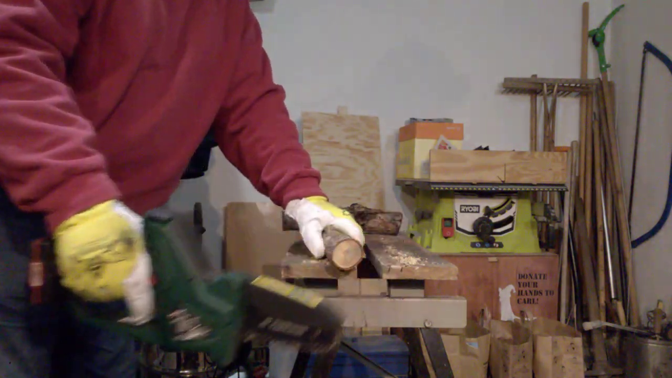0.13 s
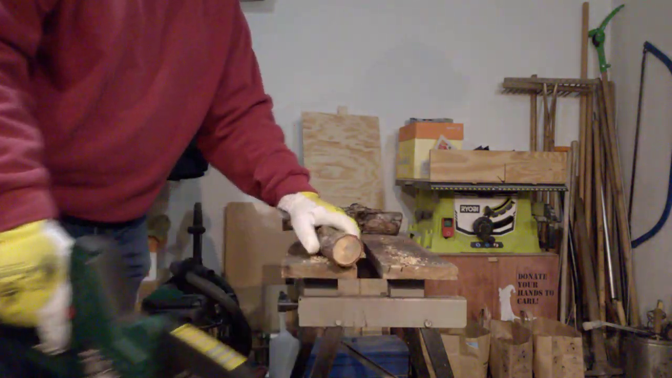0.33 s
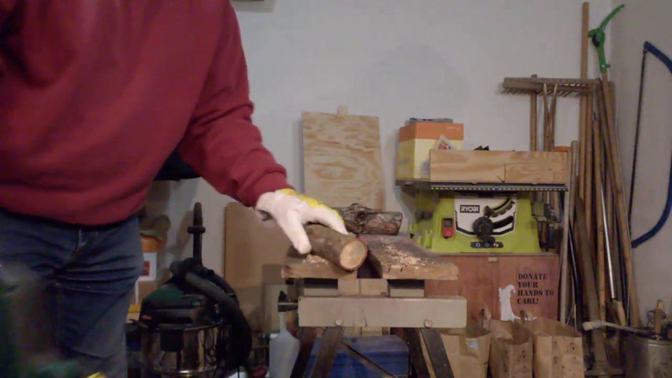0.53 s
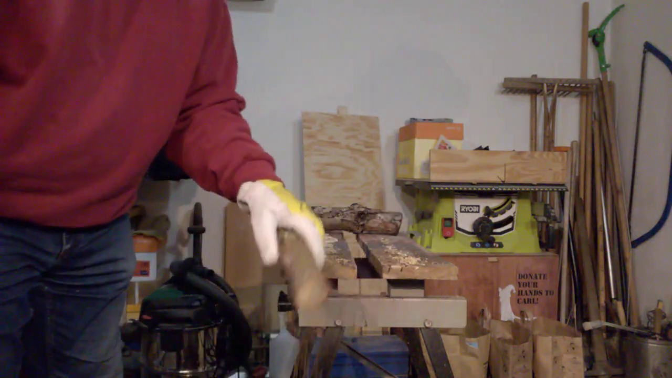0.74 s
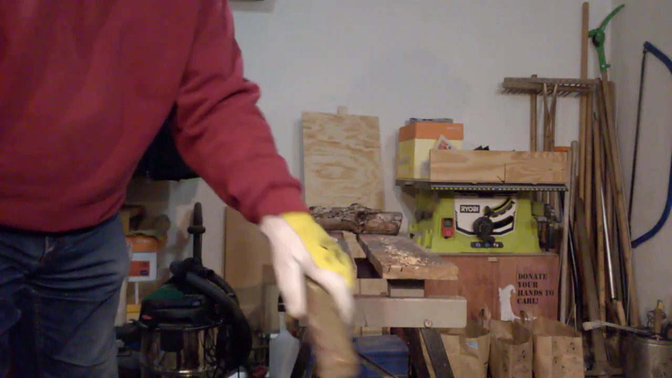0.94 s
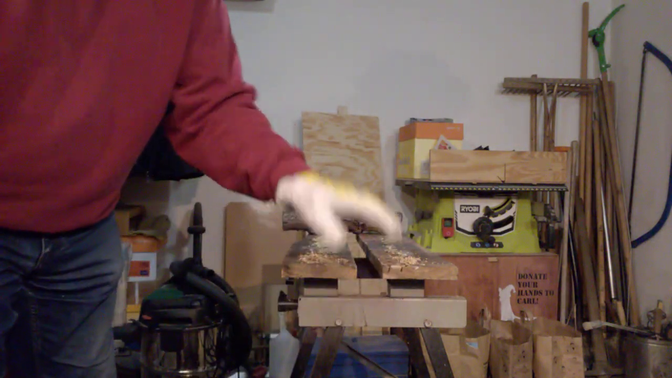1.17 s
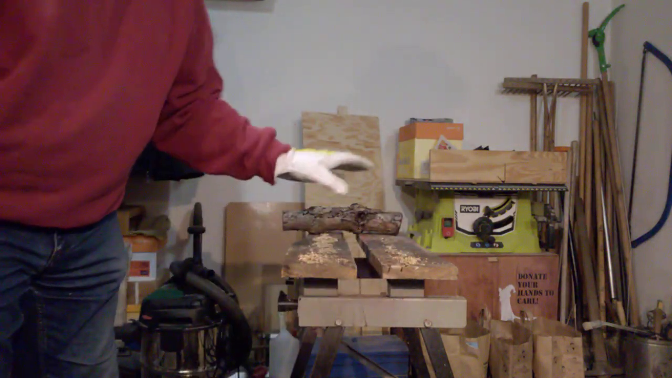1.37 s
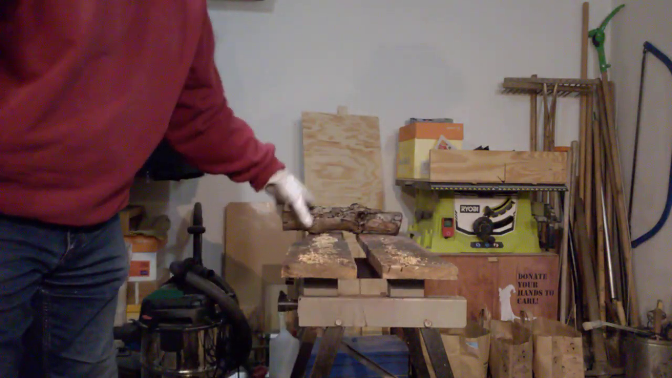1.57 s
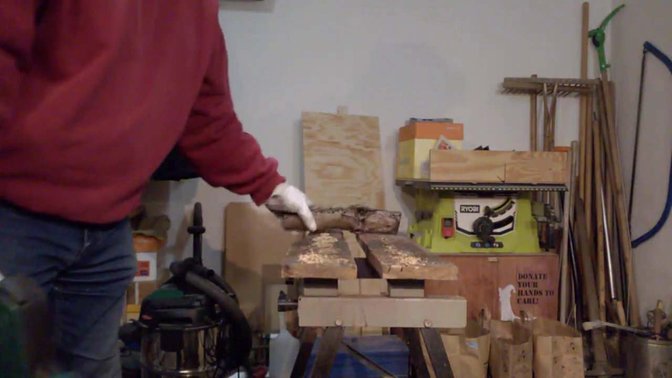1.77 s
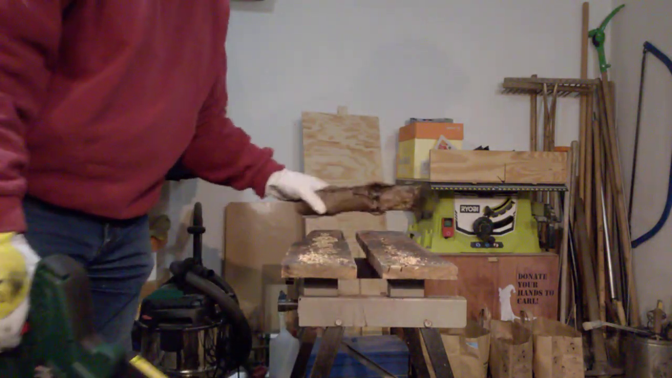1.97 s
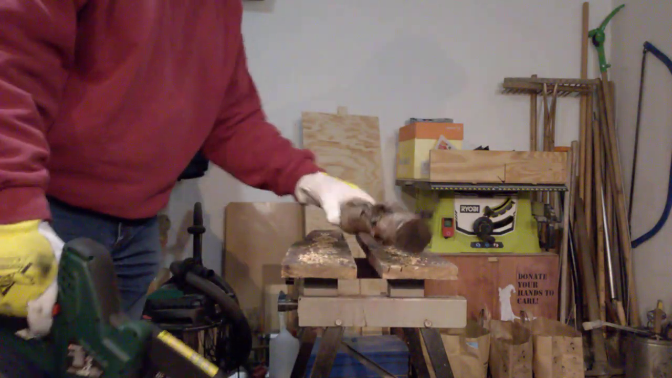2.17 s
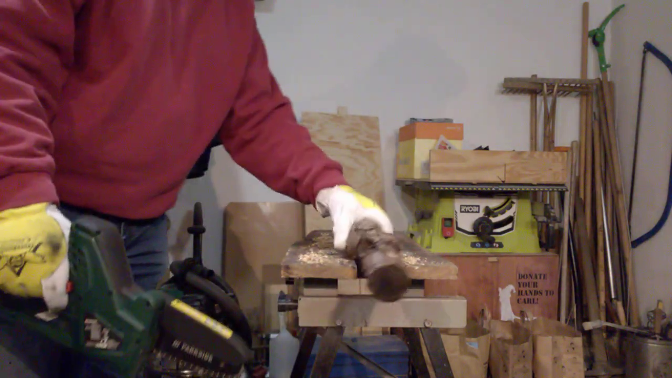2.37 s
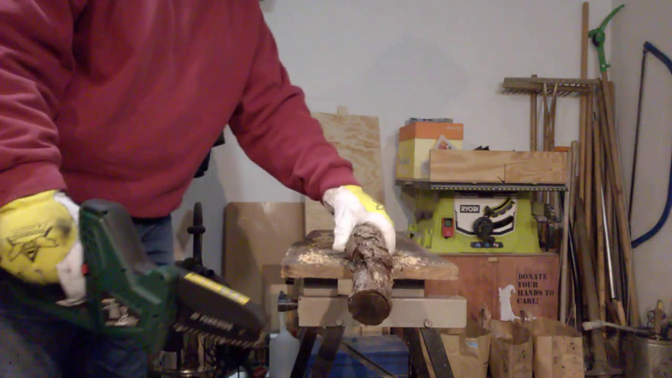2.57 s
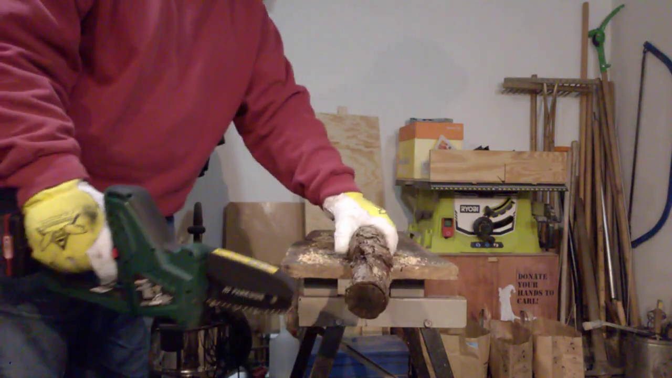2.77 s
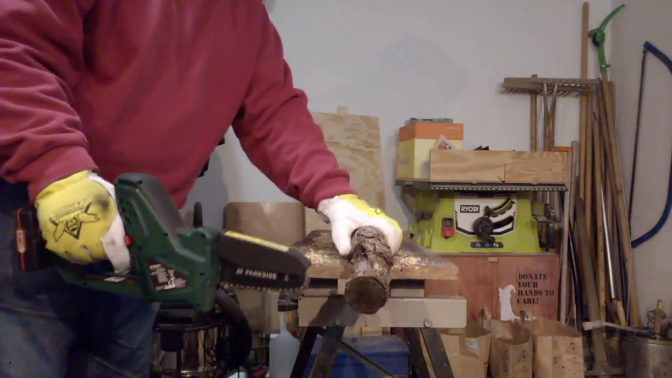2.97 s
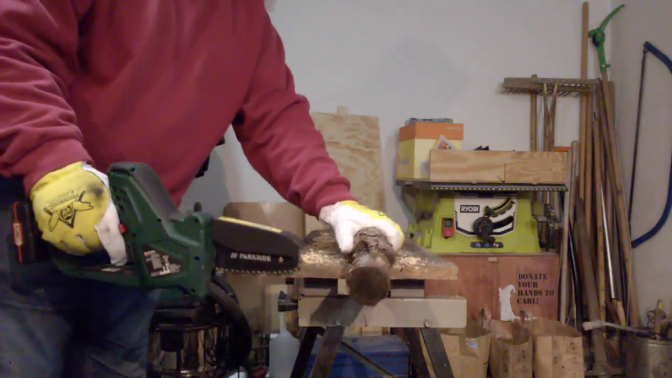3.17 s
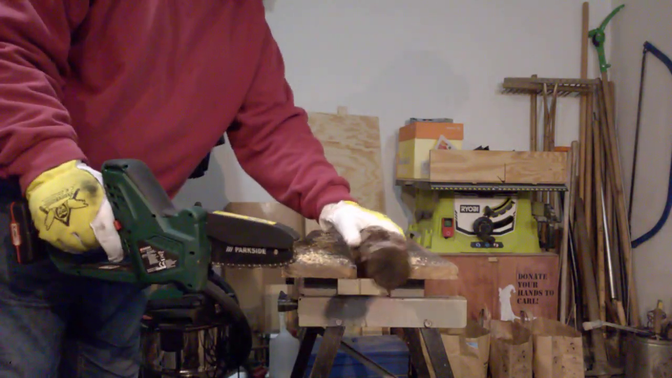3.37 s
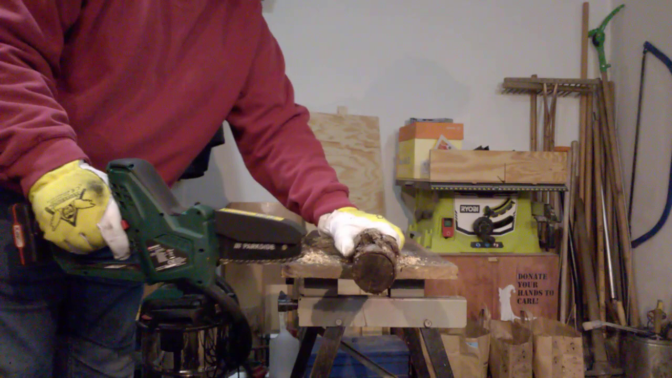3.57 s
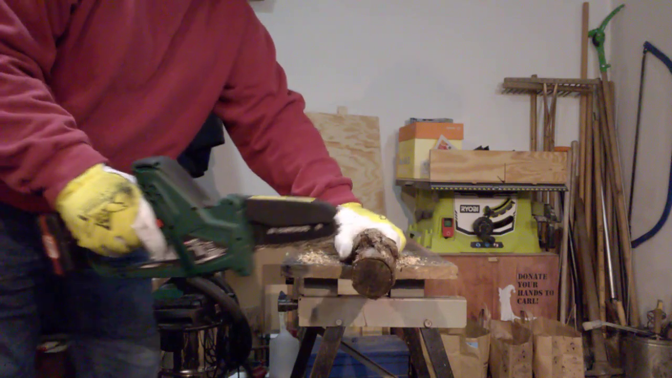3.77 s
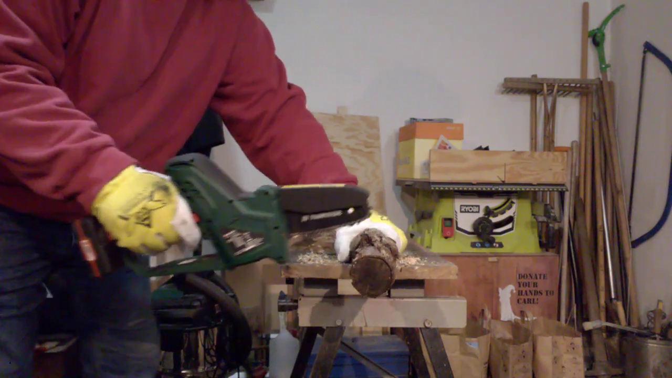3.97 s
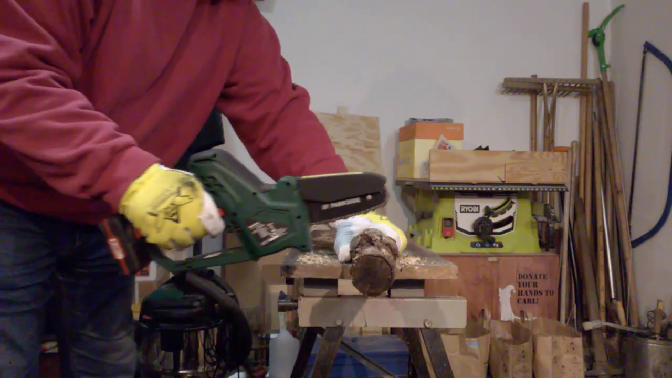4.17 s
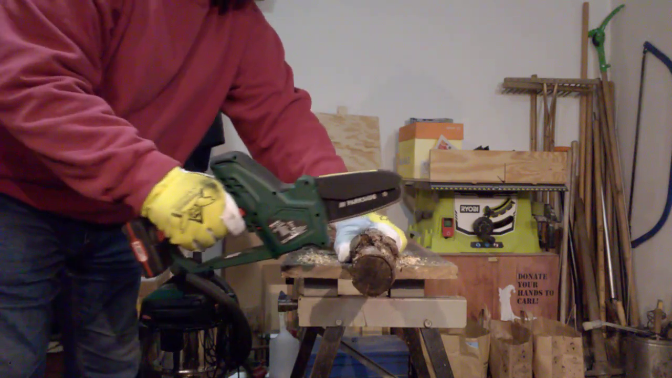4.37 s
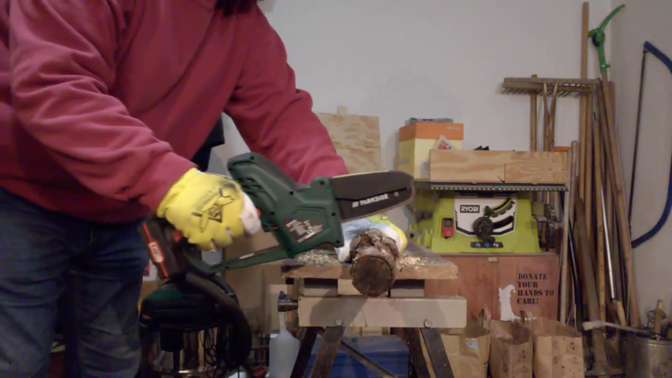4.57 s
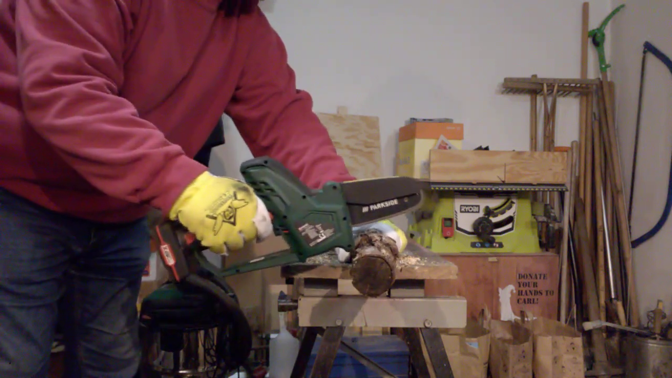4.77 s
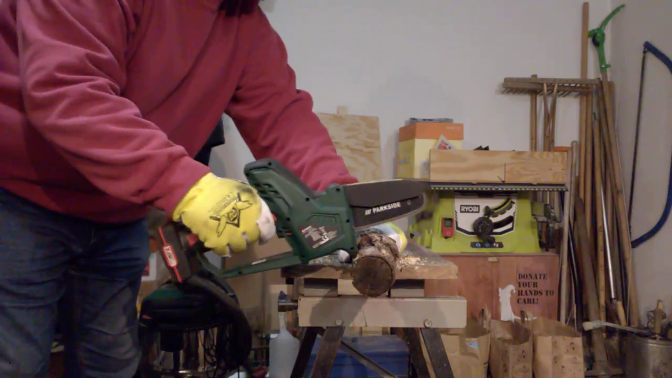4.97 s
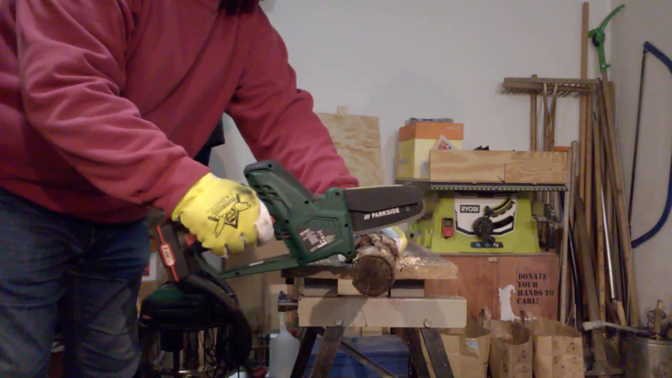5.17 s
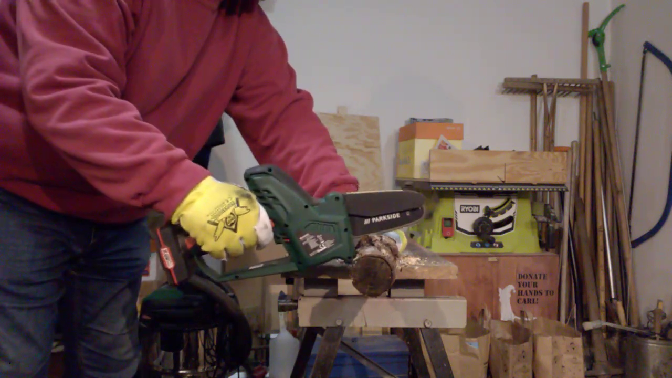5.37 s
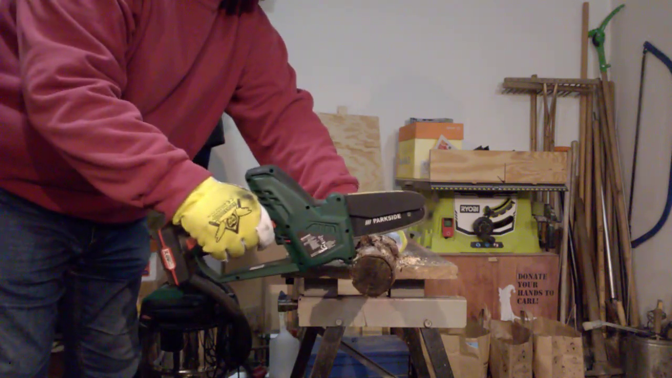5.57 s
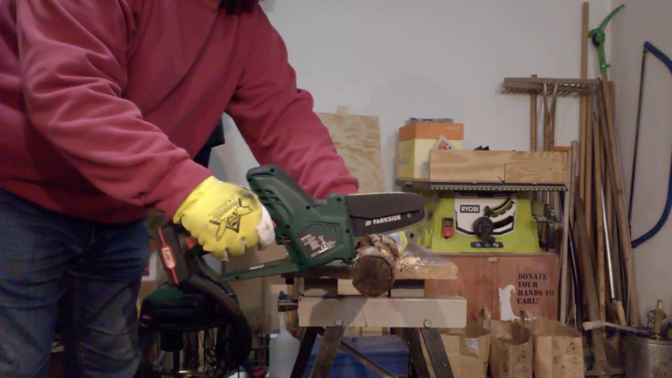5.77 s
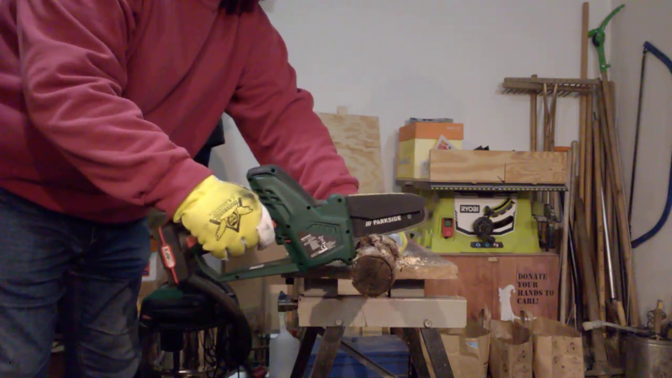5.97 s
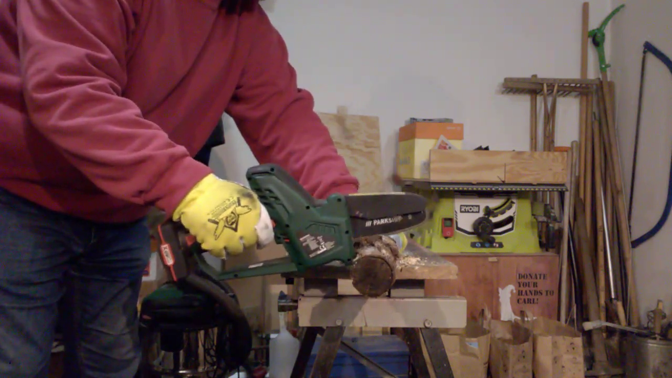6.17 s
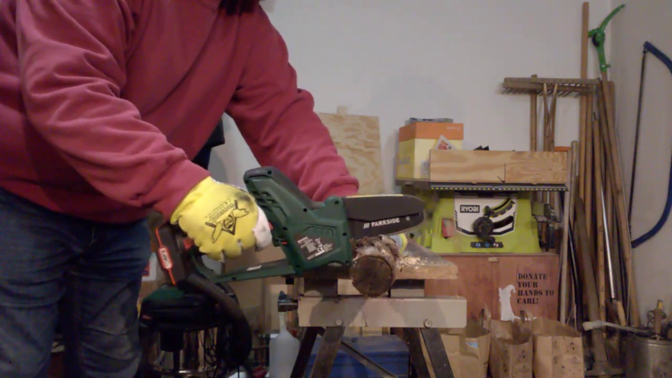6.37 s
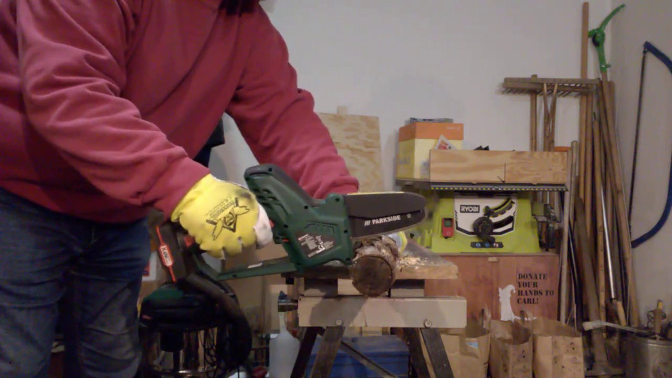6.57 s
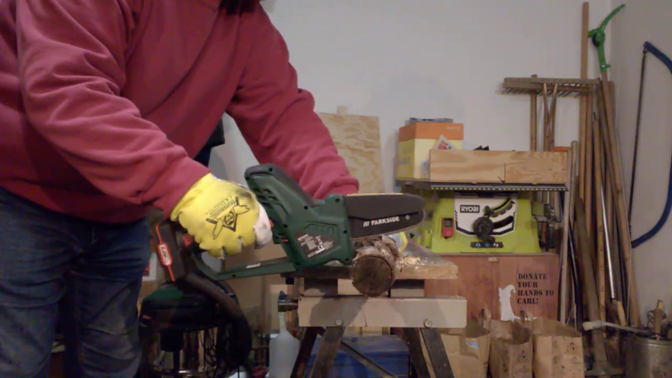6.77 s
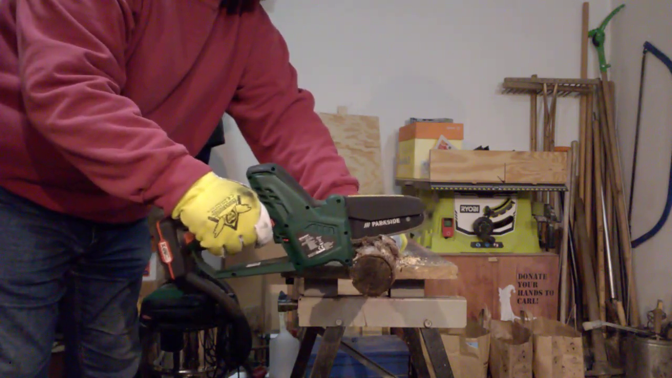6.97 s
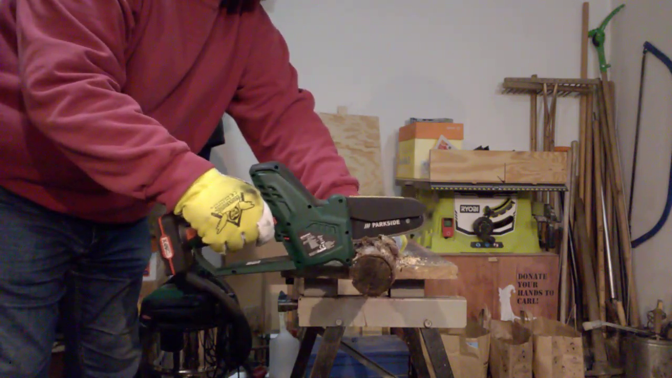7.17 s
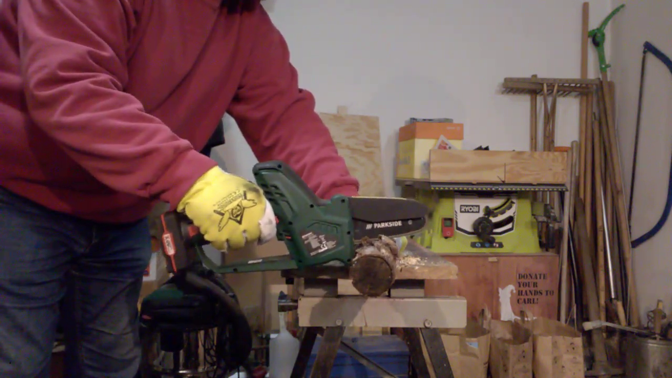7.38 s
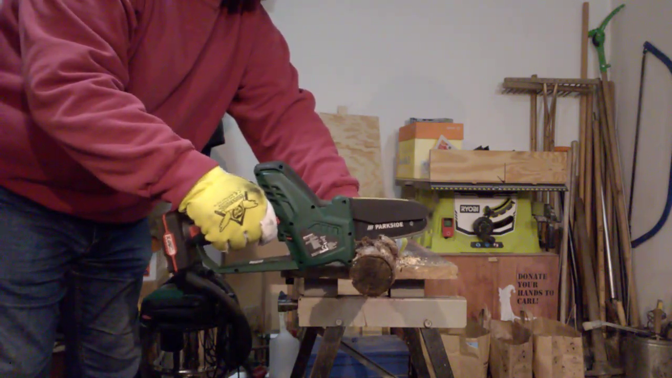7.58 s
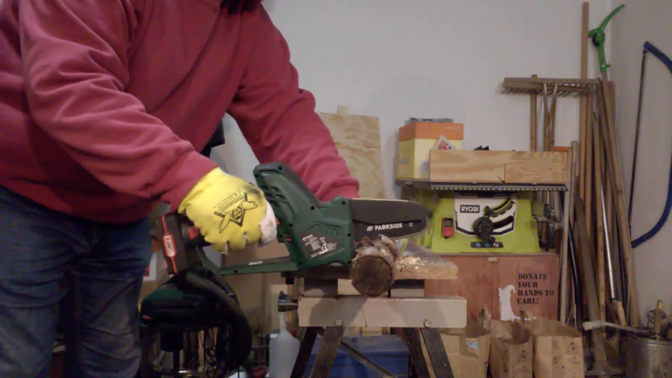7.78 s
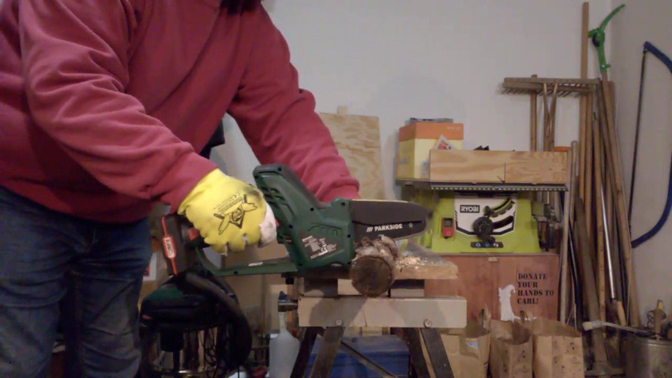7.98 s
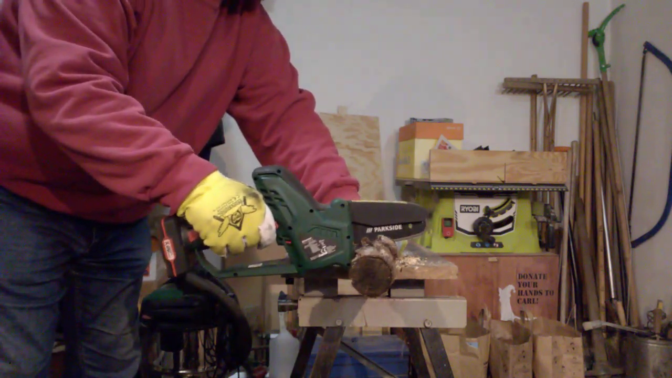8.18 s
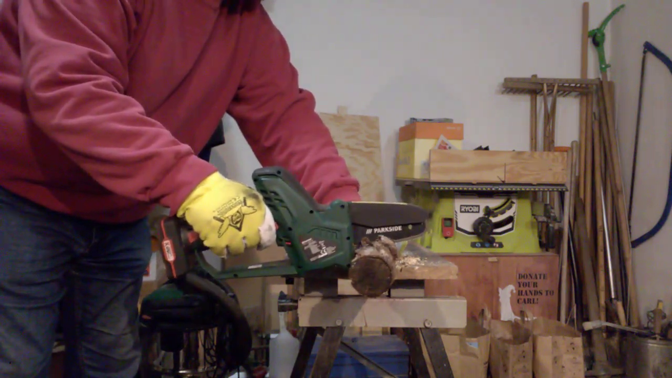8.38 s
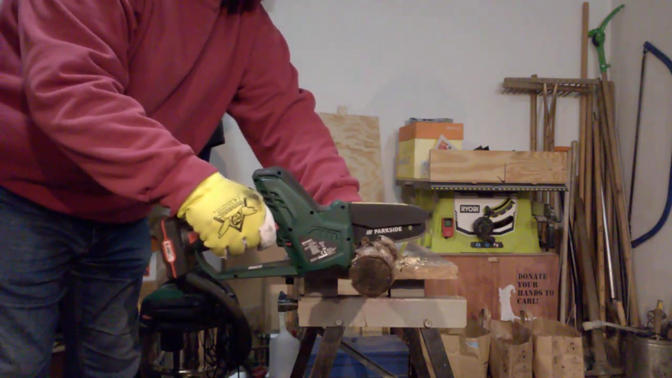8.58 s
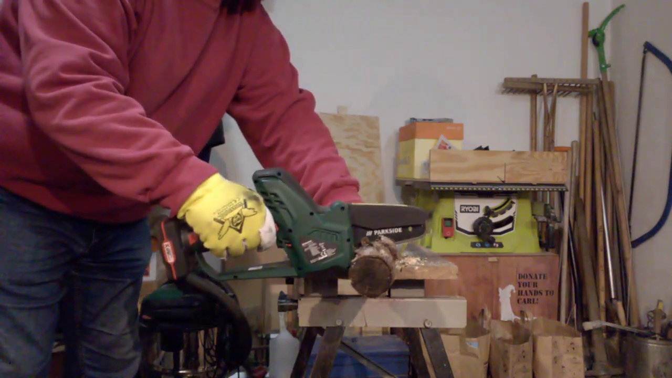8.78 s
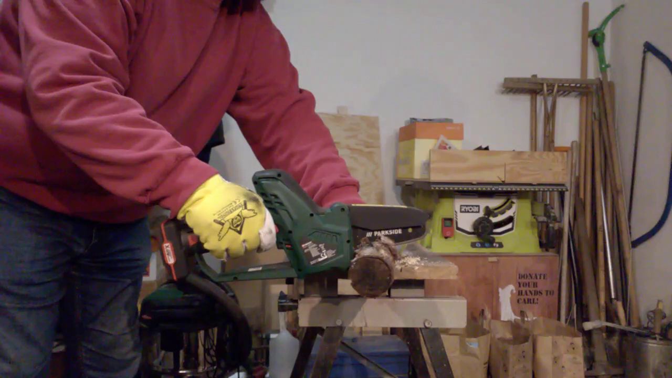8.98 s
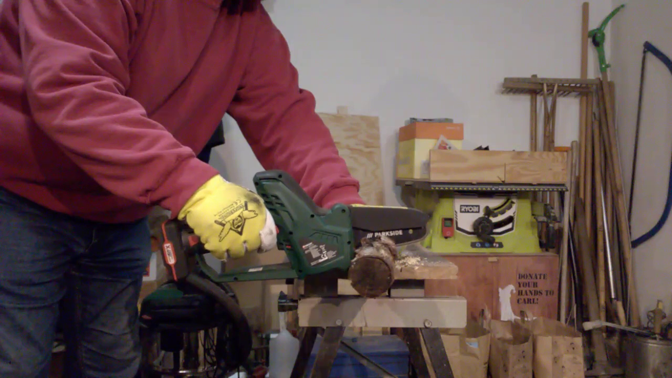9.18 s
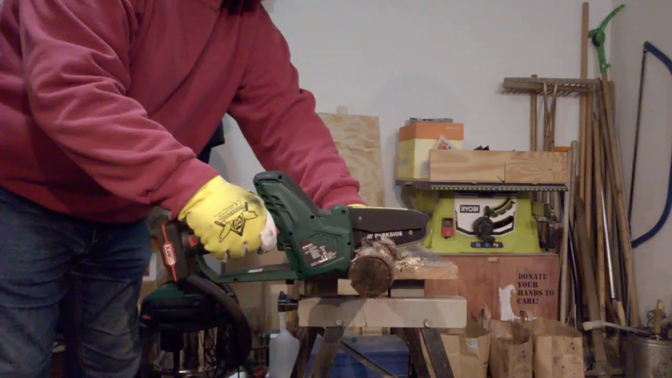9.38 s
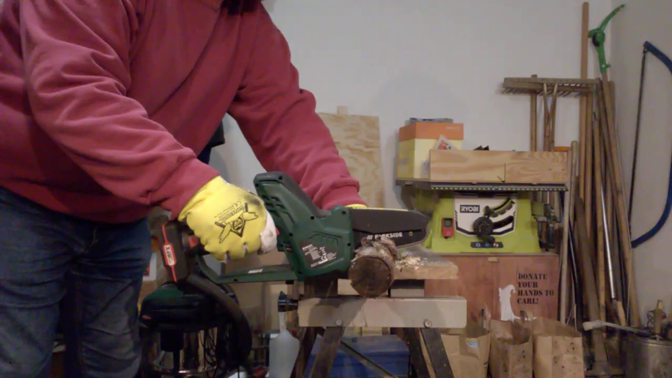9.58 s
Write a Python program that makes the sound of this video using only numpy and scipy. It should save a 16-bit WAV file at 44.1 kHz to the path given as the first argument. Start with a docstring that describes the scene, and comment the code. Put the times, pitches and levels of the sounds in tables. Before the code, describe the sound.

Loud crunchy wood knocks come first, some with a hollow ring, mixed with faint taps and grainy glove rubs. After quieter adjustments, a small electric chainsaw spins up quickly, a high squeal giving way to a bright metallic chain hiss. Entering the branch, it becomes rougher and lower, the motor whining under load until the end. Heard centrally at a moderate distance in a hard-walled, echoing workshop with very quiet background hum.

```python
"""Knocks come first, in a reverberant workshop: a sawn branch is put aside and the next set on a sawhorse. Each
knock is a crunch of noise with ringing wood and a hanging piece of steel, some with an added hollow note; taps
and rubs lie between. A small battery chainsaw then starts with a squeal of its windings, and its free chain
hisses: noise and uneven clicks at the pace of the links. It bites into the branch: the chain slows, the wood
rumbles with each cutter, and the motor's tones whine under the load. A faint hum and soft noise lie beneath."""
import sys
import numpy as np
from scipy import signal
from scipy.fft import rfft, irfft, next_fast_len
from scipy.io import wavfile
from scipy.ndimage import uniform_filter1d, map_coordinates

SR = 44100
rng = np.random.default_rng(int(sys.argv[2]) if len(sys.argv) > 2 else 0)


def store_wav(level_fs):
    """Save 16-bit WAV to argv[1]."""
    pcm = np.round(np.clip(np.atleast_2d(level_fs), -1, 1) * 32767)
    wavfile.write(sys.argv[1], SR, pcm.T.astype(np.int16))


N = 424241

# tone colour of the chain inside the cut: pitch_hz [Hz], relative level_db [dB]
CUTTING = [(120, -30), (240, -11.5), (400, -14), (600, -6), (950, -3.5), (1500, -3.5), (2200, -4),
           (3200, -1), (5700, -4.5), (8000, 0), (9900, 0), (12000, -14), (15700, -13.5)]
# tone colour of sliding and tapping: pitch_hz [Hz], relative level_db [dB]
RUSTLE = [(90, -41), (200, -6), (900, -4), (1600, -1.5), (3000, -3.5), (7500, -7.5), (10400, -5.5),
          (11800, -18.5), (15700, -18)]
# squeal of the windings as the rotor lines up:
# pitch_hz [Hz], level_db before mixing [dB], t60_s, the time to fade by 60 dB [s]
SQUEAL = [(984, -54, 1.2), (3963, -39.5, 1.1)]


def amp(db):
    """Turn decibels into a gain."""
    return 10 ** (np.asarray(db) / 20)


def unit(x):
    """Scale to an rms (average strength) of 1."""
    return x / np.sqrt(np.mean(x ** 2) + 1e-20)


def along(points, hz):
    """Read between (Hz, value) points on a logarithmic pitch axis."""
    point_hz, values = np.transpose(points)
    return np.interp(np.log(hz + 1), np.log(point_hz + 1), values)


def wobble(rate):
    """Make a smooth random curve with this many random points a second."""
    points = rng.standard_normal(int(N * rate / SR) + 4)
    return map_coordinates(points, [np.arange(N) * rate / SR])


def filtered(x, response):
    """Multiply the spectrum of x by a response that depends on frequency."""
    size = next_fast_len(len(x) + SR // 4)
    spectrum = rfft(x, size) * response(np.fft.rfftfreq(size, 1 / SR))
    return irfft(spectrum, size)[:len(x)]


def coloured(x, spectrum):
    """Shape x by a table of (Hz, dB), then scale to rms 1."""
    return unit(filtered(x, lambda hz: amp(along(spectrum, hz))))


def resonances(modes, f):
    """Add up the complex responses of parts that ring: pitch_hz, width_hz, level_db."""
    return sum(amp(db) * 1j * f * width / (centre * centre - f * f + 1j * f * width)
               for centre, width, db in modes)


def room(x, direct_db):
    """Add a fresh random echo tail, each pitch fading at its own pace, to the direct sound."""
    # how long echoes last: pitch_hz [Hz], t60_s, the time to fade by 60 dB [s]
    echo_times = [(100, 0.74), (500, 0.49), (3000, 0.4), (8000, 0.41), (15000, 0.29)]
    hz, t, noise = signal.stft(rng.standard_normal(SR), SR, nperseg=256)
    fading = noise * amp(-60 * t / along(echo_times, hz)[:, None])
    tail = signal.istft(fading, SR, nperseg=256)[1]
    tail = tail / np.linalg.norm(tail)
    tail[0] += amp(direct_db)  # direct sound, relative to the whole tail
    return signal.fftconvolve(x, tail / np.linalg.norm(tail))[:len(x)]


def shifting_room(x, direct_db, size=14000):
    """Change the echoes as the saw moves: each short overlapping stretch gets its own tail."""
    out = np.zeros(N + SR + 2 * size)
    fade = np.sin(np.pi * np.arange(2 * size) / (2 * size))
    padded = np.pad(x, (0, 2 * size))
    for start in range(4 * SR - size, N, size):
        stretch = padded[start:start + 2 * size] * fade
        piece = room(np.pad(stretch, (0, SR // 2)), direct_db)
        out[start:start + len(piece)] += piece
    return out[:N]


def tone(turns, blur, rate):
    """Make a sine at rms 1 whose strength and phase waver; rate is in random points a second."""
    carrier = np.exp(2j * np.pi * (turns + rng.random()))
    waver = 1 + blur * (wobble(rate) + 1j * wobble(rate))
    return unit(np.real(carrier * waver / np.sqrt(1 + 2 * blur ** 2)))


def clicks(turns, scatter, size_db):
    """Make one impact per whole turn, uneven in time, strength and direction."""
    whole = np.arange(1, int(turns[-1]))
    chance = rng.standard_normal((len(whole), 3))
    at = np.interp(whole + scatter * chance[:, 0], turns, np.arange(N)).astype(int)
    strength = amp(size_db * chance[:, 1]) * np.sign(chance[:, 2])
    return unit(np.bincount(at, strength, N))


def background():
    """Still air is soft coloured noise; a faint hum is a few slightly wavering low tones."""
    # steady hum in the room: pitch_hz [Hz], level_db [dB]
    hum_tones = [(44, -79), (86, -85), (168, -88.5), (393, -94.5)]
    # tone colour of the still air: pitch_hz [Hz], relative level_db [dB]
    air_colour = [(15, -31.5), (25, -5), (64, -10), (91, -10), (391, -16), (831, -24), (2870, -28.5),
                  (6990, -25), (9930, -27), (12300, -37), (15700, -37.5)]
    t = np.arange(N) / SR
    hum = sum(amp(db) * tone(hz * t, blur=0.36, rate=6) for hz, db in hum_tones)
    return hum + amp(-79.5) * coloured(rng.standard_normal(N), air_colour)


def handling():
    """Gloves, sleeves and bark slide in short grainy strokes, each with its own stressed band."""
    # strokes: middle_s [s], half_length_s [s], level_db before the swell and room [dB],
    # pitch_hz of the stressed band [Hz]
    rub_rows = [(0.148, 0.028, -57, 8450), (0.272, 0.031, -60, 7000), (0.538, 0.015, -49, 9600),
                (0.648, 0.025, -59, 8005), (0.84, 0.013, -76, 9000), (1.108, 0.022, -66, 4500),
                (1.709, 0.042, -65.5, 7000), (1.88, .025, -64, 6100), (2.803, 0.034, -61.5, 6030),
                (3.111, 0.081, -63.5, 5500), (3.441, 0.051, -57, 4800), (3.68, 0.13, -64.5, 6170),
                (3.914, 0.046, -58, 5100), (4.112, 0.027, -64.5, 4950)]
    out, t = np.zeros(N + SR), np.arange(SR) / SR
    for middle_s, half_s, db, centre_hz in rub_rows:
        start = int(max(middle_s - .4, 0) * SR)
        flicker_db = 2 * unit(uniform_filter1d(rng.standard_normal(SR), size=200))
        grain = coloured(rng.standard_normal(SR) * amp(flicker_db), RUSTLE)
        band = [(centre_hz, .5 * centre_hz, 0)]
        boost = 1 + 900 / centre_hz  # lower bands stand out more
        stroke = unit(filtered(grain, lambda f: 0.97 + np.abs(resonances(band, f)) ** 2 * boost))
        swell = np.exp(-.5 * ((t + start / SR - middle_s) / half_s) ** 2)
        out[start:start + SR] += amp(db) * stroke * swell
    return room(out[:N], direct_db=4.5)


def taps():
    """Light contacts of bark, fingers and trigger crunch briefly, each stressing one broad band."""
    # taps: start_s [s], level_db before the fade and room [dB], pitch_hz of the stressed band [Hz]
    tap_rows = [(1.057, -54, 9000), (1.078, -48, 2400), (1.092, -46, 10800), (1.612, -54, 7500),
                (1.682, -46.5, 1650), (2.994, -39, 5000), (3.007, -37.5, 2100), (3.009, -40.5, 6500),
                (3.239, -39, 2300), (3.256, -36.5, 1390), (4.179, -42.5, 6900)]
    out, t = np.zeros(N + SR), np.arange(SR) / SR
    for start_s, db, centre_hz in tap_rows:
        noise = coloured(rng.standard_normal(SR), RUSTLE)
        band = [(centre_hz, 0.85 * centre_hz, 0)]
        grit = unit(filtered(noise, lambda f: 0.1 + np.abs(resonances(band, f))))
        crunch = grit * amp(-60 * t / 0.077) * (1 - np.exp(-t / 0.011))
        out[round(start_s * SR):][:SR] += amp(db) * room(crunch, direct_db=-2.5)
    return out[:N]


def hollow_notes():
    """Some knocks and their touches also ring one hollow note, a fading sine with a soft attack."""
    # notes: start_s [s], pitch_hz [Hz], level_db before the soft attack [dB], t60_s [s]
    note_rows = [(.122, 169, -52.5, 1), (0.5, 72, -56, 0.6), (1.39, 72, -53.5, 0.62), (2.462, 161, -54, .5),
                 (3.257, 250, -59, 0.24), (3.53, 215, -58, .4), (3.603, 215.5, -52.5, 0.31),
                 (3.885, 1217, -52, 0.13)]
    out, t = np.zeros(N), np.arange(SR) / SR
    for start_s, hz, db, t60 in note_rows:
        swell = amp(db - 60 * t / t60) * (1 - np.exp(-t / 0.0056))
        out[round(start_s * SR):][:SR] += swell * np.sin(2 * np.pi * hz * t)
    return out


def blow(brightness):
    """One contact crunches the bark, with room echo, and makes the wood and a hanging piece of steel ring in
    fading sines."""
    # tone colour of the crunch: pitch_hz [Hz], relative level_db before brightness [dB]
    crunch_colour = [(25, -38), (50, -16), (75, -4), (110, -15), (170, -7.5), (270, -4.5), (400, -5.5),
                     (600, -3), (900, -6.5), (1500, -8), (2400, -11), (3270, -7.5), (3800, -16),
                     (7700, -18.5), (10400, -25.5), (11800, -39), (15700, -36)]
    # ringing of branch, sawhorse and a hanging piece of steel (the note near 2 kHz): pitch_hz [Hz], # relative
    # level_db before brightness and chance [dB], t60_s [s]
    ringing_modes = [(168.3, -7.5, 0.44), (282.2, -8.5, 0.7), (395, -20.5, 1.6), (436, -15.5, 1.1),
                     (653, -7, 0.51), (875, -1, 0.23), (1400, -5, 0.26), (2000, -26.5, 1.16),
                     (3305, -7.5, 0.46), (3320, -7, 0.28)]
    attack_s, crunch_t60_s, ring_db = 0.0087, 0.077, -21.5  # ring relative to the blow
    t = np.arange(SR) / SR

    def tilt_db(hz):
        """Brightness in dB per octave, pivoting at 1500 Hz."""
        return brightness * np.log2(hz / 1500)

    colour = [(hz, db + tilt_db(max(hz, 200))) for hz, db in crunch_colour]
    grit = coloured(rng.standard_normal(SR), colour)
    crunch = grit * amp(-60 * t / crunch_t60_s) * (1 - np.exp(-t / attack_s))
    ring = np.zeros(SR)
    for hz, db, t60 in ringing_modes:
        level_db = db + tilt_db(hz) + rng.normal(0, 2.1)
        ring += amp(level_db - 60 * t / t60) * np.sin(2 * np.pi * hz * t)
    return room(crunch, direct_db=-5.5) + amp(ring_db) * ring * (1 - np.exp(-t / 0.0052))


def knocks(count=2):
    """The branch hits sawhorse or floor: one end may touch first, then it lands and rocks to rest."""
    # knocks: start_s [s], level_db before the blow's own shape [dB],
    # brightness [dB per octave], lead_s by which one end touches first [s]
    knock_rows = [(.001, -36.5, 1.3, 0.0055), (.12, -46.5, -1.5, 0.00021), (.290, -27.5, -0.3, .004),
                  (.437, -21, 1.5, 0.016), (1.337, -20.5, 1.4, .010), (2.496, -24.5, 1.9, 0.038),
                  (3.517, -39.5, -3.0, 0.00056), (3.602, -43.5, -2.5, 0.0023), (3.885, -48, -2, 0)]
    touch_db = -14  # relative to the main blow
    # rocking: average time between contacts, first contact relative to the blow, loss at the next
    rock_s, rock_db, rock_loss_db = 0.07, -18.5, 5.5
    out = np.zeros(N + SR)
    for start_s, db, brightness, lead_s in knock_rows:
        contacts = [(start_s, db)]
        if lead_s > 0 and start_s > lead_s:
            contacts.append((start_s - lead_s, db + touch_db))
        for k in range(count):
            rock_at = start_s + rock_s * (k + rng.uniform(.8, 1.2))
            contacts.append((rock_at, db + rock_db - rock_loss_db * k))
        for at, level_db in contacts:
            out[round(max(at, 0) * SR):][:SR] += amp(level_db) * blow(brightness)
    return out[:N]


def motor_start():
    """The drive briefly pulses the windings before the rotor turns; the room holds the fading notes."""
    t = np.arange(N) / SR
    held = np.clip((t - 4.203) / 0.023, 0, 1) * np.clip((4.262 - t) / 0.028, 0, 1)
    since = np.maximum(t - 4.26, 0)
    direct = sum(amp(db) * np.sin(2 * np.pi * hz * t) for hz, db, t60 in SQUEAL)
    walls = sum(amp(db - 60 * since / t60) * tone(hz * t, blur=0.34, rate=36)
                for hz, db, t60 in SQUEAL)
    walls_fade_in = np.clip((t - 4.215) / 0.05, 0, 1)
    return 0.77 * held * direct + 0.5 * walls_fade_in * walls


def rotor_catch():
    """The lowest note of the windings glides upward as the rotor begins to turn."""
    middle_s, half_s, rise_hz_per_s = 4.265, 0.025, 3300
    level_db = -56  # before the swell and room
    t = np.arange(N) / SR
    since = np.clip(t - middle_s + 2 * half_s, 0, None)
    sweep = np.sin(2 * np.pi * (SQUEAL[0][0] * t + .5 * rise_hz_per_s * since ** 2))
    swell = np.exp(-.5 * ((t - middle_s) / half_s) ** 2)
    return room(amp(level_db) * swell * sweep, direct_db=-2)


def snag():
    """The chain grabs the bark for a moment: a short swell of noise with the colour of cutting."""
    t = np.arange(N) / SR
    swell = np.exp(-.5 * ((t - 6.183) / 0.0097) ** 2)
    grab = swell * coloured(rng.standard_normal(N), CUTTING)
    return amp(-23.0) * room(grab, direct_db=2)


def effort():
    """Run-up and the drag of the wood set chain speed, tension, load, depth and rattle gain."""
    # the branch drags the chain down as the saw is pressed in, eased off and pressed harder:
    # time_s [s], pace before the run-up is applied [cutters per second]
    pace_rows = [(5.8, 349), (6.0, 344.5), (6.2, 337), (6.4, 335), (6.6, 346.5), (7.05, 347.5), (7.5, 328),
                 (7.9, 316.5), (8.2, 310), (8.5, 310), (9.05, 299), (9.3, 280.5)]
    # free chain [cutters per second], moment of power, time scale of the run-up
    free_hz, power_on_s, spin_up_s = 349, 4.17, 0.225
    # loss of speed that pulls the chain mostly taut, and loss at full load [cutters per second]
    taut_hz, full_load_hz = 4.1, 69
    # the bar meets the bark, and the time it takes to sink to its full height
    entry_s, sink_s = 5.87, 3.3
    # rattle: running free, added by full load, lost inside the kerf (the sawn slot)
    rattle_db, load_gain_db, kerf_loss_db = -28.5, 2.5, 1.4
    kerf_shade = 0.17  # share of the bar's height that must sink for most of that loss
    t = np.arange(N) / SR
    pace_s, pace_hz = np.transpose(pace_rows)
    pace = np.interp(t, pace_s, pace_hz)
    spin = np.tanh(np.maximum(t - power_on_s, 0) / spin_up_s)
    speed = spin * pace
    tension = 1 - np.exp(-np.maximum(free_hz - speed, 0) / taut_hz)  # high in the run-up too
    load = np.maximum(free_hz - pace, 0) / full_load_hz
    depth = np.clip((t - entry_s) / sink_s, 0, 1)
    level_db = rattle_db + load_gain_db * np.sqrt(load) - kerf_loss_db * np.tanh(depth / kerf_shade)
    return speed, tension, load, depth, amp(level_db) * spin ** 2.5


def chain_slap():
    """Now and then a link hits the guide bar harder: a noise tick and a short ring."""
    t = np.arange(SR // 20) / SR
    out, rattle_gain = np.zeros(N + len(t)), effort()[-1]
    for when, softness, pick in rng.random((110, 3)):
        start = int((4.4 + when * (N / SR - 4.4)) * SR)
        ring = np.sin(2 * np.pi * (3300 + 2300 * pick) * t) * amp(-60 * t / 0.049)
        tick = coloured(rng.standard_normal(len(t)), CUTTING) * amp(-60 * t / 0.017)
        gain = rattle_gain[start] * amp(2.0 - 9.2 * softness)
        out[start:start + len(t)] += gain * (0.76 * ring + tick)
    return room(out[:N], direct_db=5.5)


def chain_rattle(turns, tension, depth, rattle_gain):
    """Links strike the sprocket and scrape along the bar's groove; the kerf changes their colour."""
    # tone colour of the free chain: pitch_hz [Hz], relative level_db [dB]
    free_colour = [(120, -57), (240, -30.5), (340, -23.5), (430, -17.5), (650, -10.5), (950, -6),
                   (1500, -7), (1900, -9), (3100, -5), (6200, -8.5), (8000, -3), (9900, -2.5),
                   (12000, -18.5), (15700, -16.5)]
    # resonances of guide bar and housing: pitch_hz [Hz], width_hz [Hz], relative level_db [dB]
    bar_modes = [(1154, 23, 1.5), (1298, 40, 2.5), (1635, 40, 5), (2320, 17, 0), (4340, 28, -26),
                 (5490, 65, 6.5)]
    # two drive links per cutter strike the sprocket
    links = shifting_room(clicks(2 * turns, scatter=.3, size_db=1.5), direct_db=-10.5)
    scrape = 1.26 * rng.standard_normal(N)
    waver_db = 0.48 * wobble(40) + .5 * tension * wobble(14) + 0.26 * wobble(5.1)
    steel = (links + scrape) * amp(waver_db)
    steel = filtered(steel, lambda f: np.abs(1 + 0.27 * resonances(bar_modes, f)))
    # blend from the free to the cutting colour as the bar sinks into the kerf
    blend = (1 - depth) * coloured(steel, free_colour) + depth * coloured(steel, CUTTING)
    return rattle_gain * unit(blend)


def wood_rumble(turns, load):
    """Each cutter jolts the branch, with a rumble that grows with the load."""
    # tone colour of the jolted branch: pitch_hz [Hz], relative level_db [dB]
    rumble_colour = [(40, -26), (70, -9), (115, -10), (170, 3.5), (240, -8.5), (330, 2), (460, 2), (560, 7),
                     (800, -36), (1500, -37)]
    idle_db, full_load_db = -80, -51.5  # the saw alone, and the part that full load adds
    impacts = shifting_room(clicks(turns, scatter=0.38, size_db=3.5), direct_db=-3)
    return (amp(idle_db) + amp(full_load_db) * np.sqrt(load)) * coloured(impacts, rumble_colour)


def running_tones(turns, speed, tension, load):
    """Chain, sprocket and idling motor sing at fixed multiples of the cutter rate."""
    # tones: multiple of the cutter rate, slack_db and taut_db before run-up and saw body [dB]
    tone_rows = [(1, -60.5, -64.5), (2, -69, -49), (2.286, -50.5, -59), (2.857, -56, -61),
                 (3, -43.5, -49.5), (3.57, -51, -57), (4, -58, -45), (4.25, -49, -61), (5.71, -53.5, -49),
                 (6.59, -69, -60), (7, -58, -52), (11, -52, -45.5), (13.56, -51.5, -46.5),
                 (15.5, -48.5, -57)]
    # hollow note of the saw's body: pitch_hz [Hz], width_hz [Hz], relative level_db [dB]
    shell_modes = [(653, 65, 2.5)]
    drive = np.minimum(speed / 335, 1) ** 7
    blur = 0.21 + 0.8 * load ** 2  # more waver under load
    total = np.zeros(N)
    for multiple, slack_db, taut_db in tone_rows:
        level_db = slack_db + tension * (taut_db - slack_db)  # rebalanced as the chain goes taut
        total += amp(level_db) * tone(multiple * turns, blur=blur, rate=12)
    return filtered(drive * total, lambda f: np.abs(1 + resonances(shell_modes, f)))


def motor_whine(turns, load):
    """Smeared multiples of the shaft rate swell as they slide through the housing's resonances."""
    # tones: multiple of the motor shaft rate, relative level_db [dB]
    motor_rows = [(4, -4), (8, -3.5), (12, -3), (16, -0.5), (20, -10)]
    # resonances of the motor housing: pitch_hz [Hz], width_hz [Hz], relative level_db [dB]
    housing_modes = [(1620, 125, -1), (3420, 850, 1), (4270, 190, 4), (6380, 210, 4.5)]
    shaft_ratio = 1.356  # shaft turns per cutter
    # before tones and housing: running free, added when labouring; load share where it labours
    idle_db, labour_db, labour_load = -57.5, -43, 0.21
    strain = amp(idle_db) + amp(labour_db) * np.tanh((load / labour_load) ** 2)
    shaft = strain * sum(amp(db) * tone(multiple * shaft_ratio * turns, blur=2.2, rate=15 * multiple)
                         for multiple, db in motor_rows)
    return filtered(shaft, lambda f: .4 + np.abs(resonances(housing_modes, f)))


def chainsaw():
    """Chain, branch and motor share one chain speed and fade in as the chain starts to move."""
    speed, tension, load, depth, rattle_gain = effort()
    running = np.clip((np.arange(N) / SR - 4.245) / 0.08, 0, 1)
    turns = np.cumsum(speed) / SR  # cutters passed so far
    rattle = chain_rattle(turns, tension, depth, rattle_gain)
    wood = wood_rumble(turns, load)
    tones = running_tones(turns, speed, tension, load)
    whine = motor_whine(turns, load)
    return running * (rattle + wood + tones + whine)


def scene():
    """Add all sources and send them to both channels alike."""
    mono = background() + handling() + taps() + hollow_notes() + knocks()
    mono = mono + motor_start() + rotor_catch() + snag() + chain_slap() + chainsaw()
    return np.array([mono, mono])


def record(dry):
    """Cut the deepest bass and fade out the top of the treble, leaving nothing above it."""
    top_hz = 15800  # middle of a 300 Hz wide fade

    def band(hz):
        """Treble fade times bass cut, which halves the sound at 35 Hz."""
        treble = np.clip((top_hz + 150 - hz) / 300, 0, 1) ** 2
        return treble * hz ** 4 / (hz ** 4 + 35 ** 4)

    return np.array([filtered(side, band) for side in dry])


dry = scene()
out = record(dry)
store_wav(out)
```